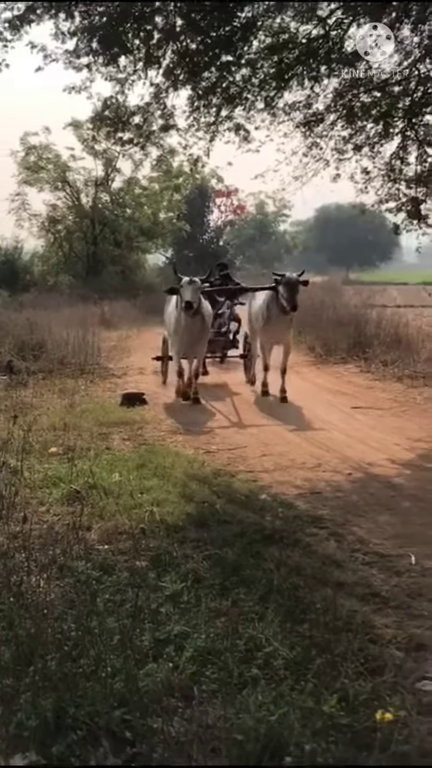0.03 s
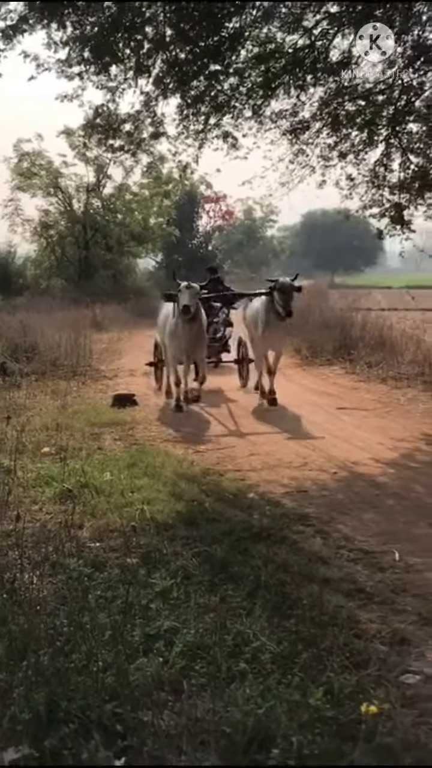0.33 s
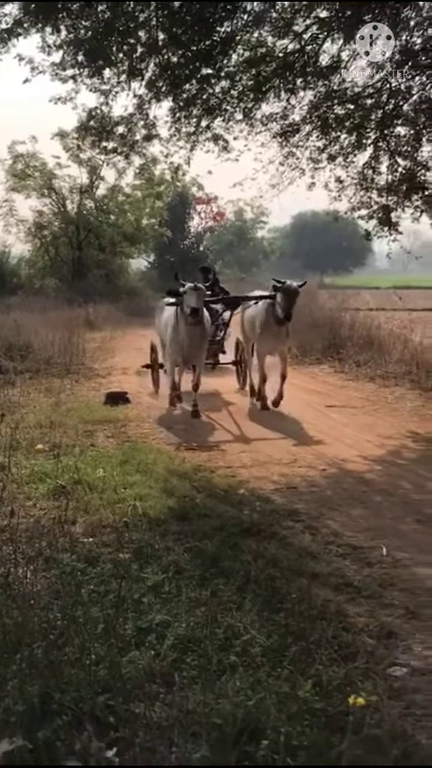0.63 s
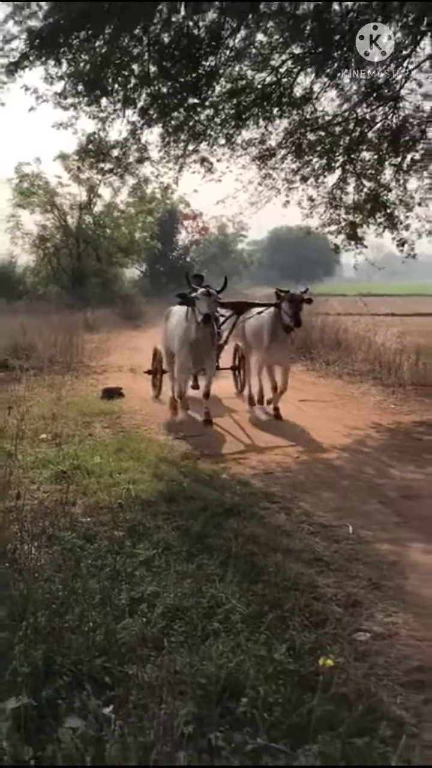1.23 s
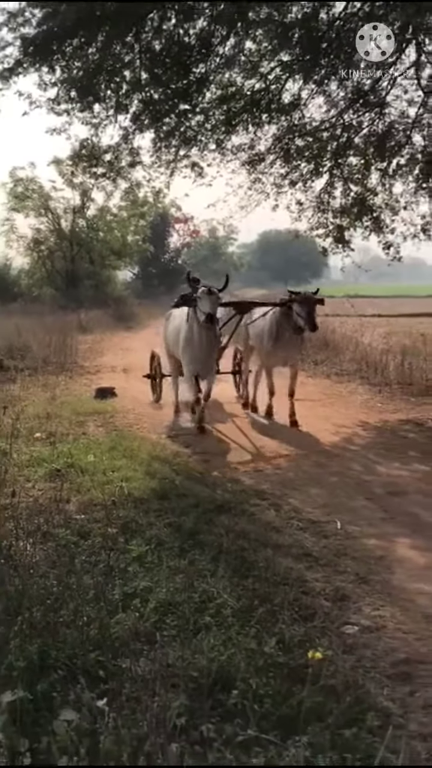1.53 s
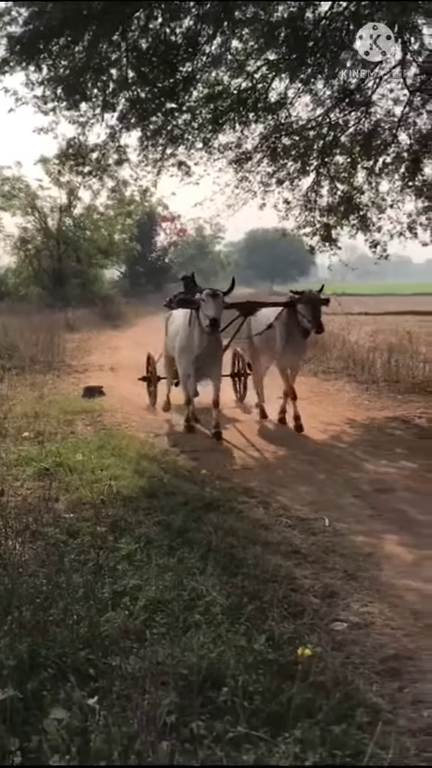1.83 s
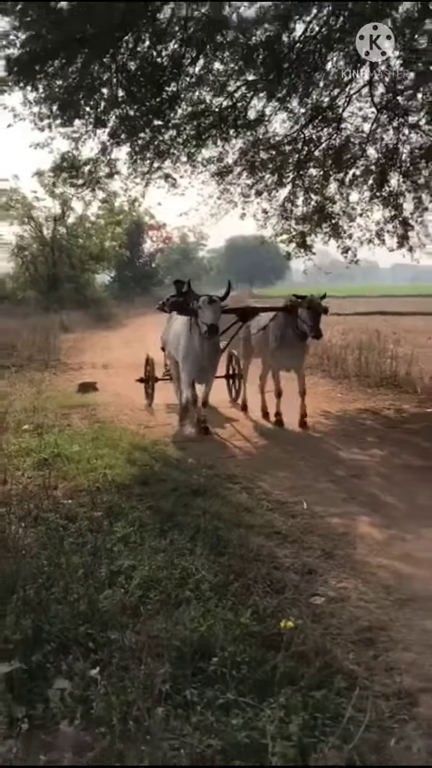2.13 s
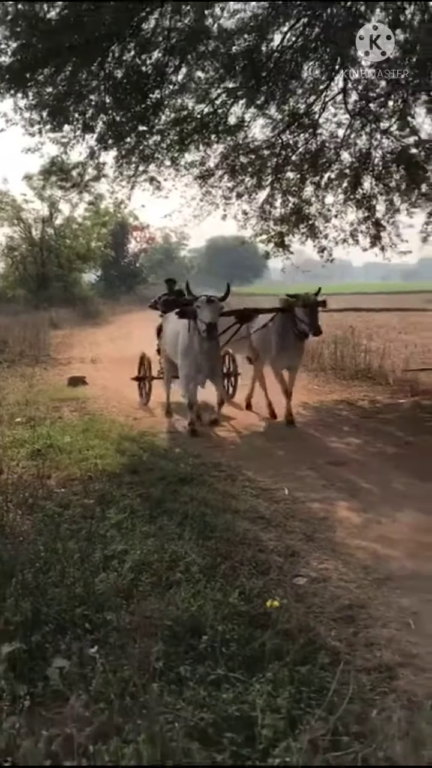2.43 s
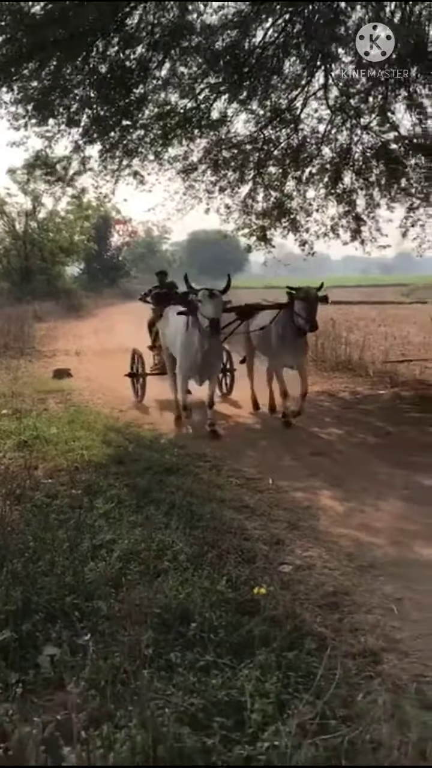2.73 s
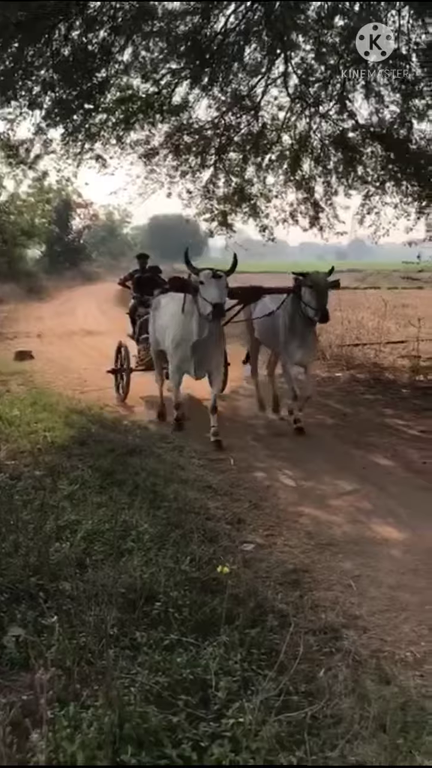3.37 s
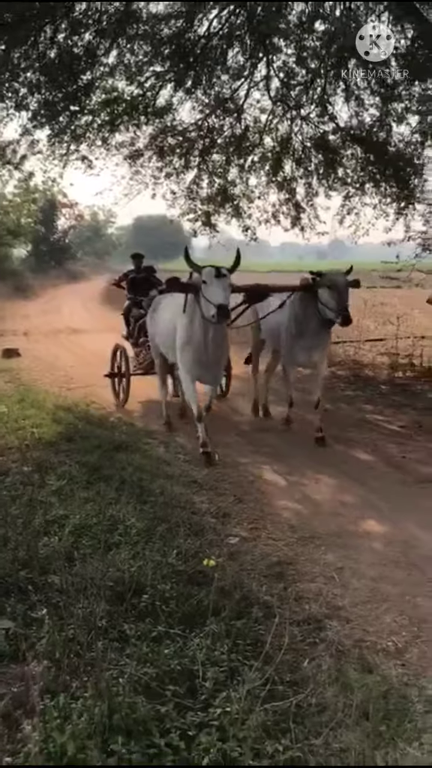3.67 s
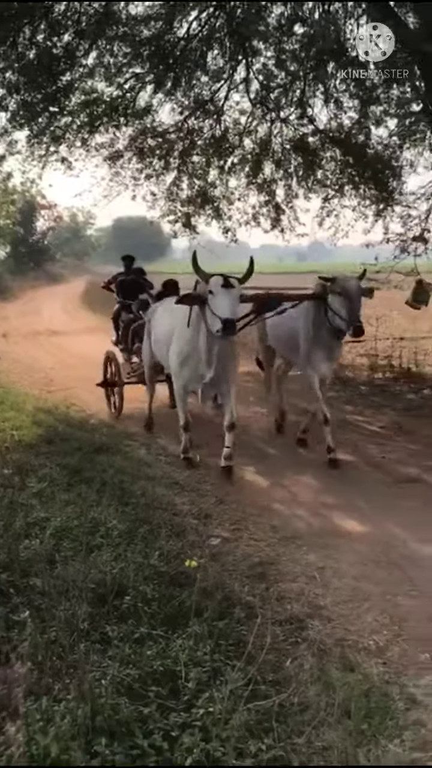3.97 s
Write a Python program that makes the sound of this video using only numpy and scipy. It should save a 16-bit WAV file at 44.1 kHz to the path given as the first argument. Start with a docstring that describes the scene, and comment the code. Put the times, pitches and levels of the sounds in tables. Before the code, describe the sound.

Outdoors, a wooden cart rattles and crunches along a dirt track, growing a little louder, its axle squeaking now and then. A far engine putters underneath, while handling thuds on the microphone end in one hard knock.

```python
"""From the start a bull-drawn cart nears on a dirt road: wheels grind grit, jolts rattle the frame and
wooden bed, a pellet jingles in a small harness bell. Underneath, a slow putter as of a far
single-cylinder engine. From 0.35 s, faint bird chirps and dull bumps of the hand-held microphone.
From 1.5 s the rubbing axle squeals now and then; from 2.7 s, light ticks close by.
A soft knock at the microphone at 3.6 s, a hard one at 3.9 s."""
import sys
import numpy as np
from scipy import signal
from scipy.fft import rfft, irfft
from scipy.io import wavfile

SR = 44100
rng = np.random.default_rng(int(sys.argv[2]) if len(sys.argv) > 2 else 0)


def digitize_waveform(pressure):
    """Quantize a signal to 16-bit integers and store it at the path in sys.argv[1].

    Rows of a 2-D input are taken as channels; values are limited to [-1, 1].
    """
    field = np.atleast_2d(pressure).T
    bounded = np.clip(field, -1, 1)
    quanta = np.round(bounded * 32767).astype(np.int16)
    wavfile.write(sys.argv[1], SR, quanta)


N = 176400
TIME_S = np.arange(N) / SR

# still air over fields: (frequency [Hz], relative density [dB])
AIR_SPECTRUM = [(20, -26), (35, -3), (55, 9), (100, -6), (170, -11), (280, -16), (450, -30.5), (800, -28),
                (1400, -34.5), (3300, -64.5), (4500, -40.5), (8000, -44.5), (11500, -48)]
# far bird: (time [s], level [dB])
CHIRPS = [(.352, -60), (.71, -63), (2.80, -57), (3.242, -61), (3.86, -61)]
# engine speed: (time [s], firing rate [Hz])
FIRING_RATE = [(0, 10.9), (.3, 10.65), (.65, 9.85), (.9, 11.4), (1.3, 10.2), (1.6, 10.8), (2.45, 10.9),
               (2.75, 11.45), (4, 11.5)]
# exhaust puffs: (time [s], level [dB])
ENGINE_LEVEL = [(0, -43.5), (.7, -45), (1.05, -41), (1.26, -38), (1.42, -44.5), (2.2, -39.5), (3, -41),
                (4, -37.5)]
# microphone handling: (time [s], level [dB], rise [s], start pitch [Hz])
BUMPS = [(0.437, -35, 0.017, 119), (0.501, -35, 0.013, 117), (0.831, -31.5, 0.014, 173),
         (1.087, -26, .021, 210), (1.474, -26, 0.012, 171), (1.99, -23, .016, 183), (2.188, -32, .02, 231),
         (2.58, -34.5, 0.014, 107), (2.761, -39.5, 0.014, 117), (2.92, -37, .016, 144),
         (3.077, -31.5, 0.014, 152), (3.249, -39.5, 0.009, 118)]
# woody ticks: (time [s], level [dB], pitch [Hz])
TICKS = [(2.7226, -40, 1080), (2.928, -55.5, 1330), (2.955, -55.5, 1190), (3.067, -46, 1120),
         (3.262, -51, 1090), (3.341, -45, 1110), (3.377, -51, 1280), (3.433, -48.5, 1190),
         (3.608, -46, 1070)]
# knocks at the microphone: (time [s], level [dB], start pitch [Hz], clack gain [dB], boom gain [dB])
KNOCKS = [(3.6137, -28, 418, -6.5, -15), (3.8783, -4.5, 275, -17.5, -8.5)]
# clack of a knock: (frequency [Hz], gain [dB], t60 [s])
KNOCK_MODES = [(504, 3, 0.011), (725, -4, 0.019), (1050, -4.5, 0.0071), (1330, -4, 0.0076),
               (1850, -8, 0.0066), (2570, -12.5, 0.0058)]
# harness bell shakes: (time [s], level [dB], length [s])
BELL_SHAKES = [(0.072, -82, .08), (0.492, -68, .06), (0.86, -78, .11), (1.591, -76.5, .05),
               (1.943, -70.5, .07), (2.287, -75, .08), (3.05, -77, .06), (3.427, -67, .025),
               (3.72, -73, .08)]
# bell shell: (frequency [Hz], gain [dB], t60 [s])
BELL_MODES = [(5045, -24, .15), (5848, 13, .15), (6650, -7, .1), (9016, -11, .2)]
# axle squeals: (time [s], level [dB], length [s], pitch [Hz])
SQUEALS = [(1.466, -58, 0.13, 2580), (1.66, -61, 0.092, 2550), (2.355, -56.5, .06, 1618),
           (2.785, -63, .07, 1612), (3.12, -57.5, .085, 1630), (3.291, -52, 0.075, 2560)]
# wooden bed clatter: (time [s], level [dB], length [s])
CLATTERS = [(0.697, -63, 0.053), (1.146, -49.5, 0.053), (1.263, -61.5, 0.074), (1.404, -70, 0.073),
            (2.277, -60, 0.022), (3.276, -56, 0.036)]
# bed boards: (frequency [Hz], gain [dB], t60 [s])
BED_MODES = [(276, 2.5, 0.042), (332, -6.5, 0.037), (700, -9, .03), (840, -2, 0.077)]
# grit under the wheels: (frequency [Hz], relative density [dB])
GRIT_SPECTRUM = [(300, -3.5), (470, -7.5), (700, -2), (1000, -10), (1420, -13.5), (1800, -5), (2350, -6.5),
                 (2900, -3), (3300, 2), (3700, 0), (3950, -11.5), (5300, -16.5), (6600, -14.5), (7800, -24),
                 (11500, -27.5)]
# frame and iron tyres: (frequency [Hz], gain [dB], t60 [s])
FRAME_MODES = [(685, -6, 0.026), (843, -2.5, 0.11), (1620, -3.5, 0.068), (1846, -20.5, 0.058),
               (2162, -9.5, 0.11), (2500, -8, 0.08), (2554, -1, 0.13), (2730, -13.5, 0.077),
               (3247, -8, 0.17), (3410, -6.5, 0.11), (3615, -4.5, 0.23)]
# rolling wheels: (time [s], relative level [dB])
ROLLING_LEVEL = [(0, -61.5), (.3, -59.5), (.8, -59), (1.08, -63), (1.2, -57.5), (1.6, -54), (1.9, -54.5),
                 (2.25, -55), (2.6, -52.5), (2.95, -55.5), (3.4, -54.5), (3.8, -54), (4, -55)]
# cart jolts: (time [s], relative level [dB], length [s], frame gain [dB], sand gain [dB])
JOLTS = [(0.213, -61, 0.1, -5, -10), (0.305, -61, 0.041, 5.5, -10), (0.483, -58, 0.02, 1, -9),
         (.71, -59.5, 0.045, 4, -1), (0.846, -54, 0.063, 2.5, -5), (1.014, -55.5, 0.016, -16, 1),
         (1.145, -55.5, 0.039, -1, -5), (1.168, -50, 0.056, 4.5, -4), (1.245, -57.5, 0.056, 8, 0),
         (1.491, -57.5, 0.04, -10, 7.5), (1.552, -53, 0.058, 2, 0.5), (1.73, -61, 0.028, 4, 3),
         (1.973, -59.5, .04, -10, -5), (2.283, -49, 0.024, -7, -5.5), (2.337, -48.5, 0.017, -5, -6),
         (2.365, -50, 0.024, 3, 2.5), (2.529, -53, 0.036, -3, -5), (2.607, -55.5, 0.095, 1, 0.5),
         (2.782, -58, 0.064, -5, 2), (3.035, -52, .04, -10, -6), (3.13, -61, 0.068, -2, 3.5),
         (3.289, -44, 0.046, -1, -0.5), (3.581, -46.5, 0.024, 5.5, -5), (3.685, -51.5, 0.028, -8, -12),
         (3.933, -56, 0.038, 10, -3)]


def from_db(db):
    """Decibels to gain."""
    return 10 ** (np.asarray(db) / 20)


def unit_rms(x):
    """Scale to rms 1."""
    return x / np.sqrt(np.mean(x ** 2) + 1e-20)


def curve(rows):
    """Linear interpolation of (time [s], value) rows."""
    return np.interp(TIME_S, *np.transpose(rows))


def add(out, at_s, sound):
    """Mix a sound in at at_s."""
    i = int(np.clip(at_s * SR, 0, N - 1))
    out[i:i + len(sound)] += sound[:N - i]


def sine(hz):
    """Sine following a per-sample pitch."""
    return np.sin(2 * np.pi * np.cumsum(hz) / SR)


def colour(x, spectrum):
    """Apply a spectrum; rms 1."""
    hz, db = np.transpose(spectrum)
    bins_hz = np.maximum(np.arange(N // 2 + 1) * SR / N, 1)
    gain = from_db(np.interp(np.log(bins_hz), np.log(hz), db))
    low_cut = np.minimum(bins_hz / hz[0], 1) ** 2
    return unit_rms(irfft(rfft(x) * gain * low_cut, N))


def drift(hz):
    """Noise low-passed at hz; rms 1."""
    r = np.exp(-2 * np.pi * hz / SR)
    return unit_rms(signal.lfilter([1], [1, -2 * r, r * r], rng.standard_normal(N + SR))[SR:])


def grains(per_s, spread_db):
    """Random clicks of uneven size; rms 1."""
    sizes = from_db(spread_db * np.minimum(rng.exponential(1, N), 4))
    return unit_rms(sizes * rng.choice([-1, 1], N) * (rng.random(N) < per_s / SR))


def ring(clicks, hz, t60_s):
    """One mode: each click starts a decaying sine."""
    r, w = from_db(-60 / (t60_s * SR)), 2 * np.pi * hz / SR
    return signal.lfilter([0, np.sin(w)], [1, -2 * r * np.cos(w), r * r], clicks + 1e-18)


def body(clicks, modes):
    """Clicks ring a set of modes; power is kept."""
    out = sum((-1) ** k * from_db(db) * unit_rms(ring(clicks, hz, t60_s))
              for k, (hz, db, t60_s) in enumerate(modes))
    return unit_rms(out) * clicks.std()


def swell(t, rise_s, sharp=2):
    """Envelope: 1 at rise_s, then decay."""
    u = np.maximum(t, 0) / max(rise_s, 1e-4)
    return (u * np.exp(1 - u)) ** sharp


def thud(start_hz, end_hz, glide_s, rise_s, sharp):
    """Low pulse of falling pitch."""
    t = TIME_S[:SR // 5]
    hz = end_hz + (start_hz - end_hz) * np.exp(-t / glide_s)
    return -sine(hz) * swell(t, rise_s, sharp)


def burst(band_hz, rise_s):
    """Short band of noise; peak 1."""
    sos = signal.butter(2, band_hz, "band", fs=SR, output="sos")
    noise = signal.sosfilt(sos, rng.standard_normal(SR // 5) * swell(TIME_S[:SR // 5], rise_s, 0.86))
    return noise / np.abs(noise).max()


def air(level_db=-51):
    """Still air: steady, mostly low noise."""
    return from_db(level_db) * colour(rng.standard_normal(N), AIR_SPECTRUM)


def bird(start_hz=4370, fall_hz=200, length_s=0.015):
    """Faint, falling chirps."""
    out, u = np.zeros(N), np.linspace(0, 1, int(length_s * SR))
    chirp = np.sin(np.pi * u) ** 2 * sine(start_hz - fall_hz * u)
    for at_s, db in CHIRPS:
        add(out, at_s, from_db(db) * chirp)
    return out


def engine(echo_s=0.026, echo_db=-10, boom_s=0.0327, boom_db=-11, uneven_db=0.13):
    """Each firing: an exhaust puff, its echo, a low boom."""
    cycles = np.cumsum(curve(FIRING_RATE)) / SR
    firings = np.floor(cycles - np.interp(0.038, TIME_S, cycles))  # first at 0.038 s
    out, level_db = np.zeros(N), curve(ENGINE_LEVEL)
    boom = thud(start_hz=75.7, end_hz=48, glide_s=0.013, rise_s=0.033, sharp=1.7)
    for i in np.flatnonzero(np.diff(firings)):
        size, detune, echo_lag, boom_lag, boom_size = rng.standard_normal(5)
        db = level_db[i] + uneven_db * size
        puff = thud(235 * (1 + 0.08 * detune), end_hz=97.2, glide_s=0.0081, rise_s=0.0082, sharp=1.48)
        add(out, i / SR, from_db(db) * puff)
        add(out, i / SR + echo_s + 0.0019 * echo_lag, from_db(db + echo_db) * puff)
        add(out, i / SR + boom_s + 0.0013 * boom_lag, from_db(db + boom_db + 2 * boom_size) * boom)
    return out


def bumps(rough_db=2.2):
    """Handling: soft, uneven thuds of sinking pitch."""
    out = np.zeros(N)
    for at_s, db, rise_s, hz in BUMPS:
        add(out, at_s, from_db(db) * thud(hz, end_hz=43.7, glide_s=0.014, rise_s=rise_s, sharp=2.4))
    return out * from_db(rough_db * drift(hz=68))


def ticks():
    """Small dry contacts ring for a few cycles."""
    out, t = np.zeros(N), TIME_S[:SR // 20]
    envelope = swell(t, rise_s=0.0006, sharp=0.9)
    for at_s, db, hz in TICKS:
        add(out, at_s, from_db(db) * np.sin(2 * np.pi * hz * t) * envelope)
    return out


def knocks(rebound_s=0.0055, rebound_db=-2, snap_db=-38, hiss_db=-57):
    """Hard contact: snap, clack and rebound, a thud falling into a boom, faint hiss."""
    out, t = np.zeros(N), TIME_S[:SR // 20]
    clack = sum((-1) ** k * from_db(db - 60 * t / t60_s) * np.sin(2 * np.pi * hz * t)
                for k, (hz, db, t60_s) in enumerate(KNOCK_MODES))
    for at_s, db, hz, clack_db, boom_db in KNOCKS:
        fall = dict(start_hz=hz, end_hz=46.8, glide_s=0.0028)
        punch = thud(**fall, rise_s=0.0027, sharp=0.5)
        boom = from_db(boom_db) * thud(**fall, rise_s=0.032, sharp=7.1)
        add(out, at_s + 0.0014, from_db(db) * (punch + boom))
        add(out, at_s, from_db(db + clack_db) * clack)
        add(out, at_s + rebound_s, from_db(db + clack_db + rebound_db) * clack)
        add(out, at_s - 0.0008, from_db(db + snap_db) * burst(band_hz=(5030, 9000), rise_s=0.00022))
        add(out, at_s, from_db(db + hiss_db) * burst(band_hz=(4500, 11000), rise_s=0.028))
    return out


def bell():
    """The pellet tumbles in the shell at each shake."""
    shaking = sum(from_db(db) * (TIME_S > at_s) * (TIME_S < at_s + length_s)
                  for at_s, db, length_s in BELL_SHAKES)
    return body(grains(per_s=400, spread_db=6.5) * shaking, BELL_MODES)


def axle(waver_hz=12, rough_db=4):
    """The rubbing axle sings briefly on one frame mode."""
    out = np.zeros(N)
    detune_hz = waver_hz * drift(hz=57)
    roughness = from_db(rough_db * drift(hz=50))
    for at_s, db, length_s, hz in SQUEALS:
        arch = np.sin(np.pi * np.clip((TIME_S - at_s) / length_s, 0, 1))
        out += from_db(db) * arch * roughness * sine(hz + detune_hz)
    return out


def bed():
    """Boards chatter over the ruts."""
    shaking = sum(from_db(db) * swell(TIME_S - at_s, length_s / 2) for at_s, db, length_s in CLATTERS)
    return body(grains(per_s=500, spread_db=1) * shaking, BED_MODES)


def clinks(stones=40, per_s=420, low_hz=1905, high_hz=7176):
    """Small stones clink briefly under the wheels, one mode each; rms 1."""
    pitches_hz = np.geomspace(low_hz, high_hz, stones) * rng.uniform(0.985, 1.015, stones)
    ringing = sum(ring(grains(per_s / stones, spread_db=3), hz, t60_s=0.082) for hz in pitches_hz)
    return colour(ringing, GRIT_SPECTRUM)


def jolts(attack_s=0.003, hold_fraction=0.59, release_s=0.012):
    """Power envelopes of the jolts: crunch, sand, frame."""
    crunch_power, sand_power, frame_power = np.zeros((3, N))
    for at_s, db, length_s, frame_db, sand_db in JOLTS:
        t = TIME_S - at_s
        release = np.exp(-np.maximum(t - hold_fraction * length_s, 0) / release_s)
        jolt = from_db(db) * np.clip(t / attack_s, 0, 1) * release
        crunch_power += jolt ** 2
        sand_power += (jolt * from_db(sand_db)) ** 2
        frame_power += (jolt * from_db(frame_db)) ** 2
    return crunch_power, sand_power, frame_power


def cart(flutter_db=1.83, grit_db=-7.5, clink_db=-10, crunch_db=-4, frame_db=-9.5, sand_above_hz=4100):
    """Rolling grinds grit and clinks pebbles; jolts crunch grains and sand; both rattle the frame."""
    rolling = from_db(curve(ROLLING_LEVEL) + flutter_db * drift(hz=18.4))
    crunch_power, sand_power, frame_power = jolts()
    grit = from_db(grit_db) * colour(grains(per_s=5000, spread_db=1), GRIT_SPECTRUM)
    pebbles = from_db(clink_db) * clinks()
    coarse = colour(grains(per_s=2200, spread_db=2), GRIT_SPECTRUM)
    sand = signal.sosfiltfilt(signal.butter(8, sand_above_hz, "high", fs=SR, output="sos"), coarse)
    crunch = (coarse - sand) * np.sqrt(crunch_power) + sand * np.sqrt(sand_power)
    shaking = np.sqrt(rolling ** 2 + frame_power)
    frame = body(grains(per_s=500, spread_db=4) * shaking, FRAME_MODES)
    return (grit + pebbles) * rolling + from_db(crunch_db) * crunch + from_db(frame_db) * frame


def scene():
    """Open-air mix, mono."""
    mix = air() + cart() + bed() + axle() + bell() + engine() + bumps() + knocks() + ticks() + bird()
    return mix[None]


def record(dry):
    """Steep low-pass."""
    cutoff_hz = 11800
    return signal.sosfilt(signal.ellip(10, 0.1, 70, cutoff_hz, fs=SR, output="sos"), dry)


dry = scene()
out = record(dry)
digitize_waveform(out)
```